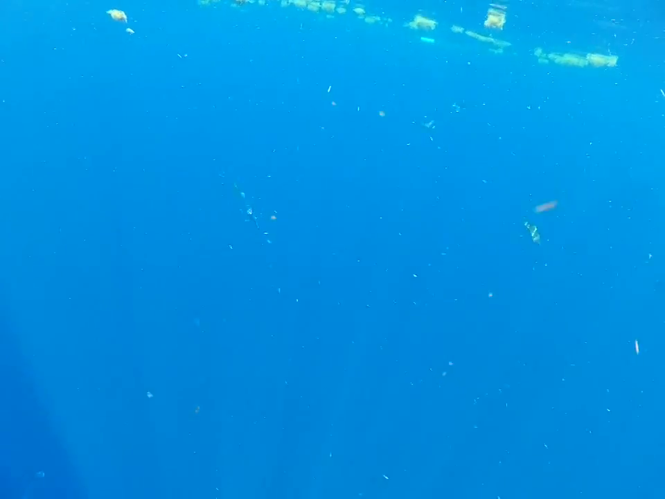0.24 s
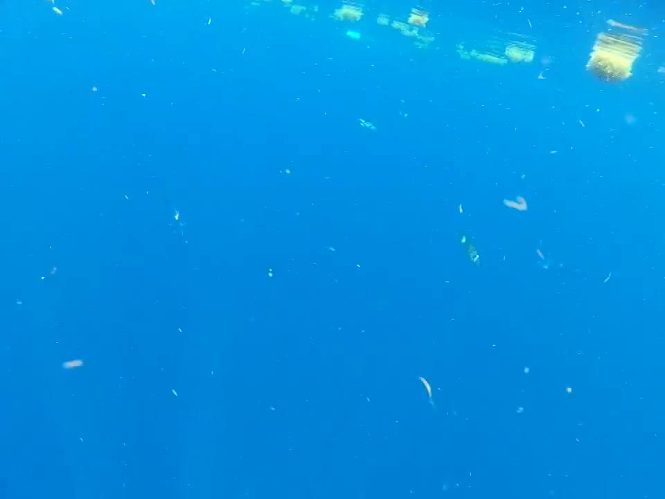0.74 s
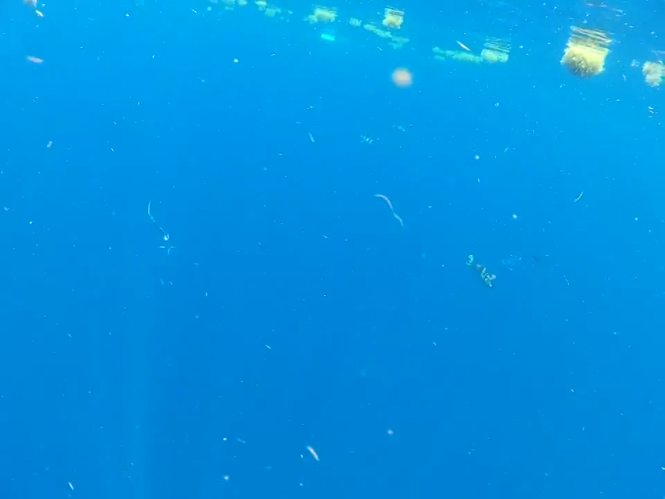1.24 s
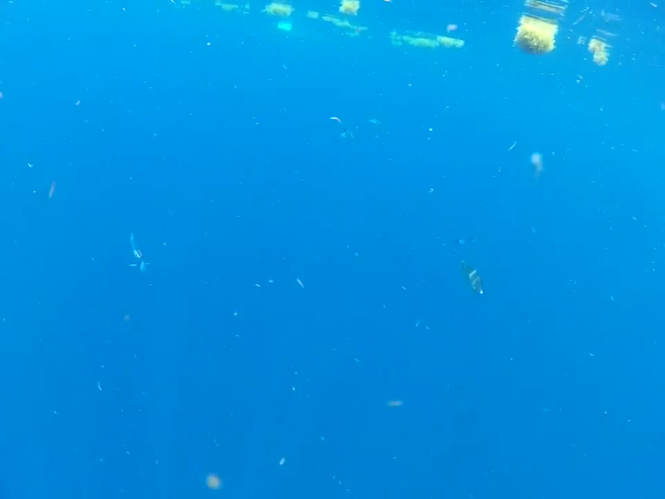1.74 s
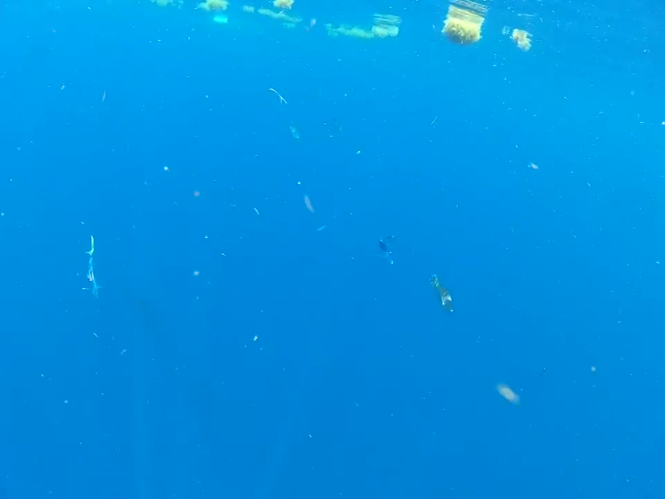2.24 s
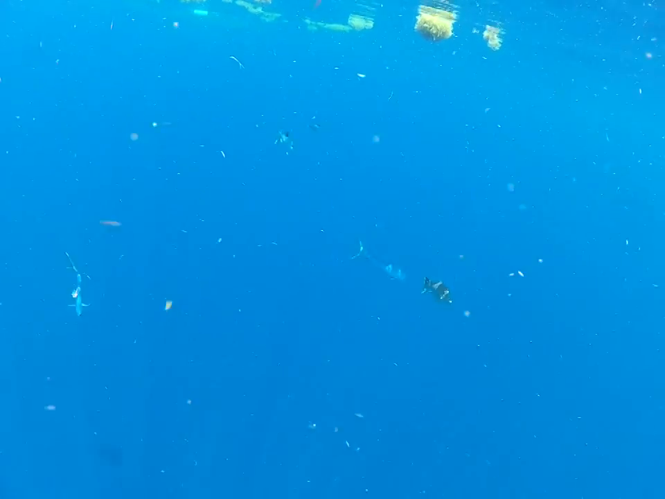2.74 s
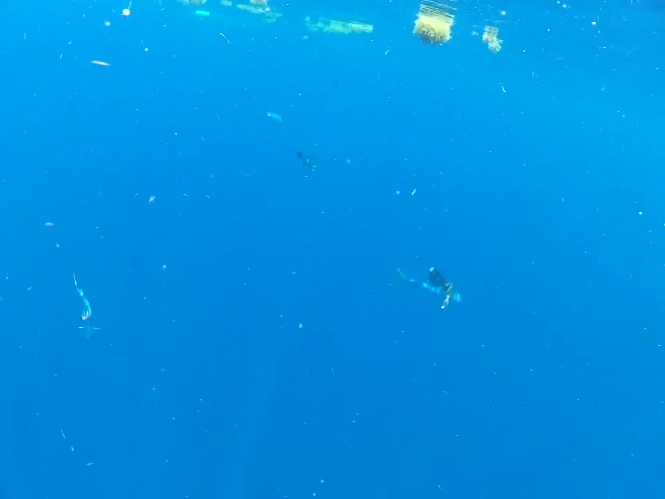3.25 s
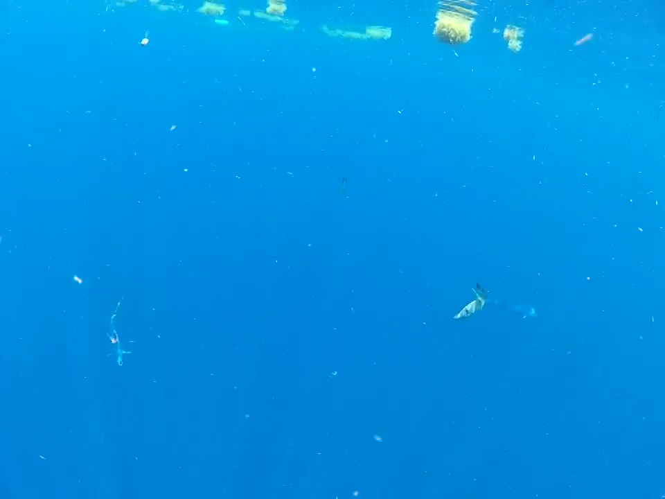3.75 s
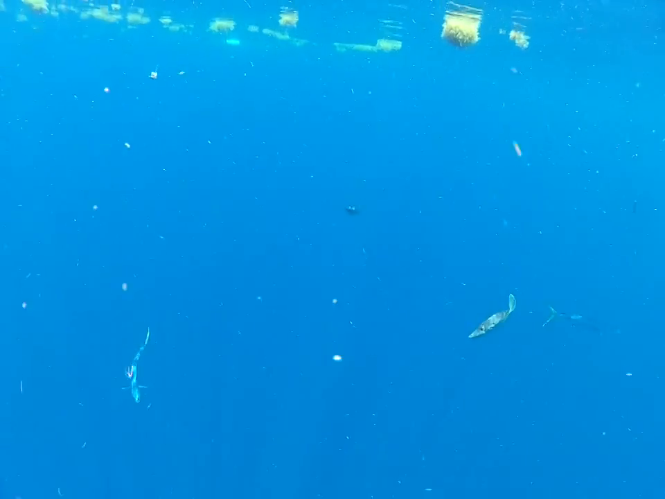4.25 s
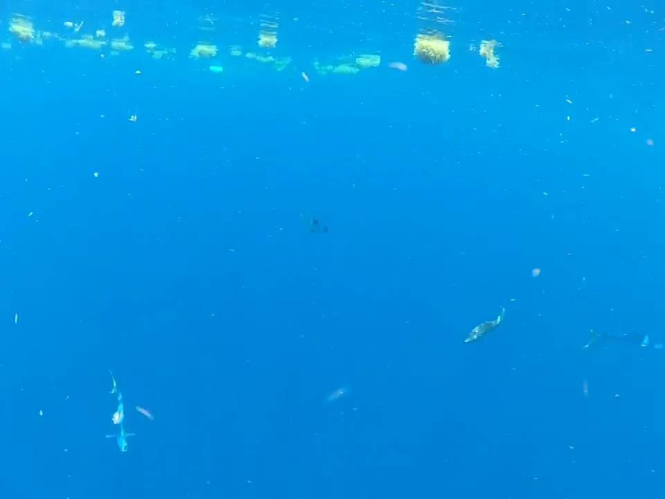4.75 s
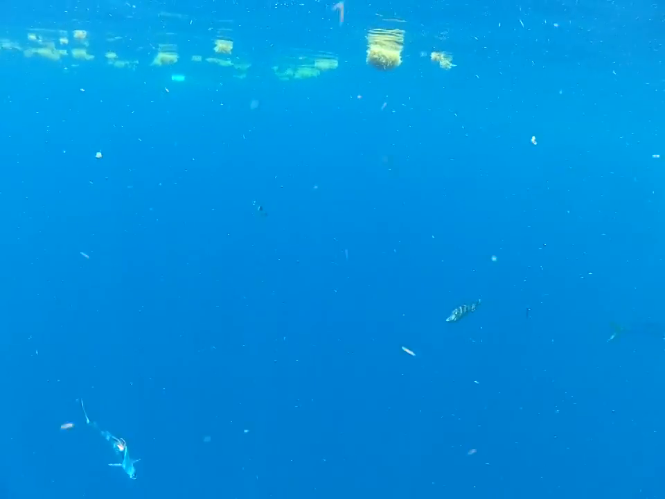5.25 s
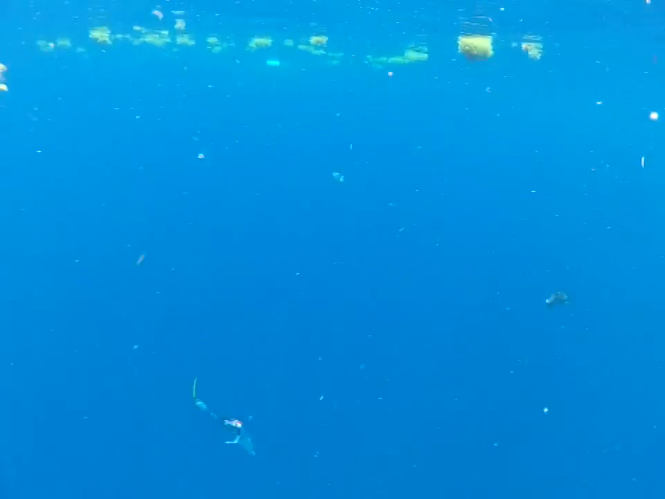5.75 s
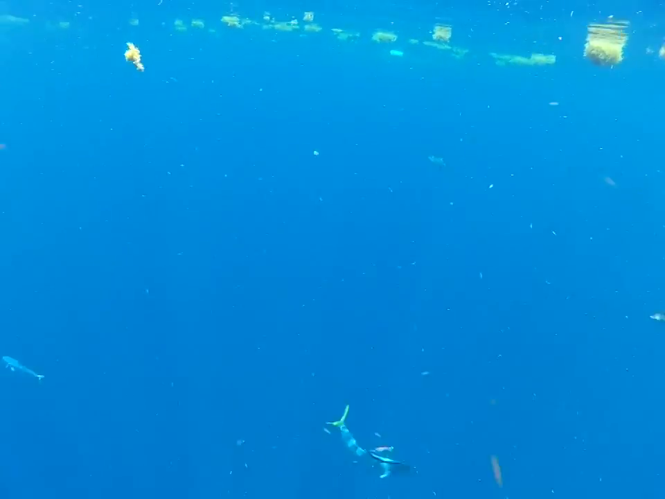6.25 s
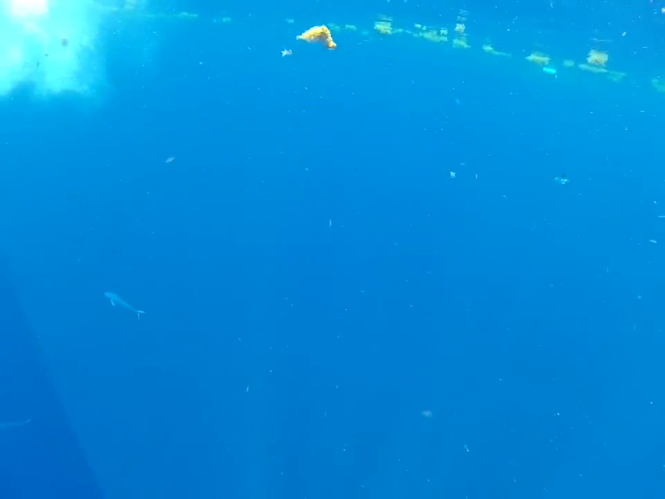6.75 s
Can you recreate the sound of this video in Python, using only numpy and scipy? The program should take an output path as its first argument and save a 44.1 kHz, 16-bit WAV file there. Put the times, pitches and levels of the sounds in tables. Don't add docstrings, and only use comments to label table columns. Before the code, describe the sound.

Inside a sealed underwater housing, a boat engine drones low while the mount bumps and rattles, water churns, and a small bubble rings.

```python
import sys
import numpy as np
from scipy import signal
from scipy.fft import rfft, irfft
from scipy.io import wavfile
from scipy.ndimage import uniform_filter1d

SR = 44100
rng = np.random.default_rng(int(sys.argv[2]) if len(sys.argv) > 2 else 0)


def dump(signal):
    limited = np.clip(np.atleast_2d(signal).T, -1, 1)
    pcm = np.round(limited * 32767).astype(np.int16)
    wavfile.write(sys.argv[1], SR, pcm)


def volts_from_decibels(level):
    exponent = np.asarray(level, float) / 20
    return 10 ** exponent


N = 308259
T = np.arange(N) / SR

# time in seconds, firing rate in Hz, load in dB over idle.
ENGINE_RUN = [(0, 30, -5.5), (.5, 30, 1.5), (1.4, 31.71, -5.5), (2.0, 32.63, -1), (2.35, 35.04, 1),
              (2.6, 37.6, 5.5), (2.8, 38.85, 7), (3.02, 39.17, 11.5), (3.2, 40.85, 12), (3.42, 44.4, 11.5),
              (3.52, 45.3, 4), (3.65, 45.94, 7), (3.85, 45.55, 2), (4.3, 42.9, 1), (4.52, 39.96, 5),
              (4.8, 36.4, 0), (5.9, 35.87, -3), (7, 35.88, 2.5)]
# multiple of the firing rate, level at idle in dB, share of the load followed.
MAIN_ORDERS = [(1, -39, 0.21), (2, -44, 1.43), (3, -48.5, 0.92)]
# multiple of the firing rate, level in dB relative to their common level.
WEAK_ORDERS = [(.5, -7), (1.5, -3.5), (2.5, -5), (3.5, -14.5), (4, -13), (4.5, -17.5), (5, -16),
               (5.5, -19.5), (6, -23.5)]
# time in seconds, change in dB, width in seconds.
LULLS = [
    (.05, -24, 0.23),
    (1.399, -5.5, 0.29),
    (2.17, -3, .1),
    (2.65, -3, .15),
    (3.5, -25, 0.072),
    (4.1, -4, .12),
    (4.6, 4, .25),
    (5.75, -5, 0.16),
]
# frequency in Hz, gain in dB.
HULL_PATH = [(30, -3.5), (42, 1), (75, -4), (82, 3.5), (94, -0.5), (108, 3), (122, -8.5), (134, 3.5)]
# frequency in Hz, width in Hz, level in dB.
HULL_MODES = [(30, 30, -2), (97.6, 38.7, 1), (200, 27, -12.5)]
# frequency in Hz, width in Hz, level for water noise in dB, level for a knock in dB.
HOUSING_MODES = [(225, 47, -8, -11.5), (337.4, 69, -2, -4), (445, 83, -4, 1.5), (554, 49, -0.5, 6),
                 (630, 49, -8, -37), (917, 81, 0, -2.5), (1084, 133, -1.5, -5.5), (1395, 127, -4.5, -6.5),
                 (1688, 84, -13.5, -16), (2053, 199, -5.5, -4), (2215, 174, -6.5, 1.5),
                 (2330, 76, -7.5, -32), (2765, 190, -19, -5), (2890, 115, -10, -26), (3450, 294, -19, -15),
                 (3810, 1100, -26.5, -10), (4270, 660, -26, -21.5), (5200, 1300, -41, -82),
                 (5790, 860, -18.5, -7.5)]
# time in seconds, peak in dB, length in ms.
THUMPS = [(.397, -14, 6.5), (0.4164, -9.5, 18.7), (0.4487, -14.5, 9.3), (0.484, -19.5, 24),
          (0.6277, -16.5, 27), (0.7903, -21.5, 19), (0.829, -32.5, 18), (1.2021, -18.5, 17.5),
          (1.2332, -27, 22), (1.8277, -26.5, 4.3), (1.889, -27.5, 31), (1.9579, -23.5, 6.7),
          (2.226, -28, 39), (2.2767, -29, 19), (2.3053, -30, 7.7), (2.4727, -25, 11), (4.2876, -32, 8.5),
          (4.7787, -28.5, 17), (5.6446, -27, 7.7), (5.814, -26, 6.9), (5.851, -23, 18.6),
          (6.1892, -25.5, 11), (6.361, -32, 15), (6.4044, -18.5, 9.5), (6.415, -27, 6.5),
          (6.4622, -26, 15.7), (6.515, -22, 30), (6.557, -24.5, 14), (6.756, -25.5, 39.5),
          (6.9275, -29.5, 19)]
# time in seconds, peak in dB, frequency in Hz.
MOUNT_RINGS = [(.392, -29, 256), (.411, -36, 243), (0.427, -28.5, 260), (0.481, -27.5, 229),
               (1.199, -36, 235), (1.956, -37.5, 200), (2.771, -34.5, 236), (4.829, -38.5, 238),
               (5.791, -31.5, 173.3), (6.403, -37, 236), (6.509, -37.5, 200)]
# time in seconds, peak in dB.
ARM_SWAYS = [
    (0.517, -30),
    (0.591, -27),
]
# time in seconds, level in dB.
DULL = (0.5, 4500, -1.5, 15), [(.386, -40), (.406, -36), (.421, -38)]
PADDED = (-5.5, 700, 2.5, 47), [(.387, -25), (.406, -23.5), (.424, -31), (.478, -26), (.493, -29.5),
          (.524, -33), (.558, -42), (.595, -27.5), (.648, -36.5), (1.187, -36), (5.779, -39),
          (6.399, -32.5)]
SHARP = (1.5, 6100, 2.5, 23.8), [(.4445, -13.5), (.456, -32), (.465, -29), (.474, -37), (.516, -28)]
RATTLE = (0.7, 2800, 0.3, 20.5), [(.524, -24.5), (.534, -44), (.544, -37), (.558, -45), (.569, -30.5),
          (.578, -24), (.585, -43), (.591, -31), (.598, -34), (.6046, -27), (.614, -29), (.620, -40),
          (.631, -41), (.644, -36), (.658, -42), (.670, -39.5), (.700, -51)]
SCRAPE = (2.5, 1200, 1.5, 24), [(4.830, -29), (4.837, -27), (4.844, -30), (4.857, -29), (4.863, -29),
          (4.871, -31)]
TICK = (-1.5, 3200, .5, 12), [(3.636, -44), (4.825, -36), (6.3978, -30)]
# time in seconds, peak in dB, frequency in Hz, t60 in ms.
BUBBLES = [
    (4.002, -30, 1095, 32),
    (3.985, -41, 1140, 15),
]
# time in seconds, level in dB over calm.
CHURN = [(0, -0.5), (.39, 1), (.53, 7), (.65, 1), (.82, 0.5), (1.8, 1.5), (2.63, 4.5), (3.43, 7), (4.13, 7),
         (4.4, 4.5), (5.5, 4), (7, 5)]
# frequency in Hz, threshold in dB relative to the mean treble level.
MASKING = [(3000, -9), (4500, -7), (6000, -12), (7000, -4), (8500, -4), (12000, -7), (13700, -2),
           (14600, -3), (15000, 0)]

CHATTER_S, CHATTER_HOLD_S, EDGE_S = 2.16, 0.47, 0.057
LABOUR_HOLD_S, LABOUR_DB, LABOUR_FROM = 0.78, 12, 3.4
HOLD_HZ, TOP_HZ = 12000, 15050


def in_time(rows):
    s, *columns = np.transpose(rows)
    return [np.interp(T, s, column) for column in columns]


def rms_one(x):
    return x / np.sqrt(np.mean(x ** 2) + 1e-20)


def drift(rate):
    r = np.exp(-80 * np.pi * rate / SR)
    noise = rng.standard_normal(N // 40 + 2002)
    slow = signal.lfilter([1], [1, -2 * r, r * r], noise)[2000:]
    return np.interp(np.arange(N) / 40, np.arange(len(slow)), rms_one(slow))


def hold(start, length):
    return np.clip(np.minimum(T - start, start + length - T) / EDGE_S + 1, 0, 1)


def resonate(x, hz, width):
    r = np.exp(-np.pi * 1.55 * width / SR)
    b = (1 - r * r) / 2 * np.array([1, 0, -1])
    a = [1, -2 * r * np.cos(2 * np.pi * hz / SR), r * r]
    once = signal.lfilter(b, a, x + 1e-18)
    return signal.lfilter(b, a, once)


def noise_in(modes, flicker_db, shared_db):
    out = 0
    for hz, width, level_db in modes:
        gain = volts_from_decibels(level_db + flicker_db * drift(7.3) + shared_db)
        out = out + gain * resonate(rng.standard_normal(N), hz, width)
    return rms_one(out)


def engine():
    rate, load_db = in_time(ENGINE_RUN)
    turn = 2 * np.pi * np.cumsum(rate) / SR
    path_hz, path_db = np.transpose(HULL_PATH)
    lull_db = sum(db * np.exp(-((T - s) / width) ** 2) for s, db, width in LULLS)
    labour_db = LABOUR_DB * hold(CHATTER_S, LABOUR_HOLD_S)
    orders = []
    for k, idle_db, share in MAIN_ORDERS:
        level_db = idle_db + share * load_db + np.interp(np.log(k * rate), np.log(path_hz), path_db)
        orders.append((k, level_db + (k == 1) * lull_db))
    for k, relative_db in WEAK_ORDERS:
        level_db = -47.5 + 0.29 * load_db + relative_db
        orders.append((k, level_db + (k > LABOUR_FROM) * labour_db))
    pump_phase = 2 * np.pi * 53.6 * T + 0.4 * drift(1.7)
    out = volts_from_decibels(-59 + 1.1 * drift(3.8)) * np.sin(pump_phase)
    for k, level_db in orders:
        phase = k * turn + k * 0.32 * drift(2.45) + rng.uniform(0, 2 * np.pi)
        out += volts_from_decibels(level_db + 1.95 * drift(3.3)) * np.sin(phase)
    return np.sqrt(2) * out, turn, load_db


def chatter():
    return volts_from_decibels(-44.5) * hold(CHATTER_S, CHATTER_HOLD_S) * noise_in([(189.8, 27.4, 0)], 0.54, 0)


def thumps():
    pushes = [(s, db, 101.9 + 25 * volts_from_decibels(db), ms) for s, db, ms in THUMPS]
    pushes += [(s, db, hz, 12.4) for s, db, hz in MOUNT_RINGS]
    pushes += [(s, db, 50.7, 17) for s, db in ARM_SWAYS]
    out = np.zeros(N)
    for s, peak_db, hz, ms in pushes:
        near = slice(int((s - .08) * SR), int((s + .08) * SR))
        t = T[near] - s
        swell = np.exp(-(2000 * t / ms) ** 2 / 2)
        out[near] += volts_from_decibels(peak_db) * swell * np.cos(2 * np.pi * hz * t)
    return out


def knocks():
    out, span = np.zeros(N), int(.12 * SR)
    t = T[:span] * 1000
    contacts = [row + kind for kind, rows in (DULL, PADDED, SHARP, RATTLE, SCRAPE, TICK) for row in rows]
    for s, level_db, tilt_db, cut_hz, rise, t60 in contacts:
        attack = np.minimum(t / max(rise, .1), 1) ** 2
        shape = attack * volts_from_decibels(-60 * np.maximum(t - rise, 0) / t60)
        burst = shape * rng.standard_normal((2, span))
        start = int(s * SR)
        for k, (hz, width, _, knock_db) in enumerate(HOUSING_MODES):
            share = np.sqrt(np.mean(shape ** 2) * width / SR)
            gain = share * volts_from_decibels(level_db + knock_db + tilt_db * np.log2(hz / 1000) + 16)
            gain /= 1 + (hz / cut_hz) ** 4
            out[start:start + span] += gain * rms_one(resonate(burst[k % 2], hz, 1.55 * width))
    return out


def bubbles():
    out = np.zeros(N)
    for s, peak_db, hz, t60 in BUBBLES:
        t = np.maximum(T - s, 0)
        shape = volts_from_decibels(peak_db - 6e4 * t / t60) * (1 - np.exp(-t / .002))
        out += shape * np.sin(2 * np.pi * hz * t * (1 + 4.4 * t))
    return out


def water(turn, load_db):
    churn_db, = in_time(CHURN)
    shake_db = 12 * np.exp(-((T - 0.51) / 0.21) ** 2)
    hull_db = -45.5 + 0.82 * load_db + shake_db
    surge_db = 0.32 * drift(4.7) + 0.5 * np.sin(turn)
    low = [mode[:3] for mode in HOUSING_MODES if mode[0] < 770]
    high = [mode[:3] for mode in HOUSING_MODES if mode[0] > 770]
    rumble = volts_from_decibels(hull_db) * noise_in(HULL_MODES, 0.9, 0)
    wash = volts_from_decibels(-52 + churn_db) * noise_in(low, 2.8, surge_db)
    hiss = volts_from_decibels(-58 + 0.97 * churn_db) * noise_in(high, 0.93, surge_db)
    return rumble + wash + hiss


def scene():
    hum, turn, load_db = engine()
    return (hum + chatter() + thumps() + knocks() + bubbles() + water(turn, load_db))[None]


def sample_and_hold(x):
    kept = signal.sosfilt(signal.cheby2(8, 32, 6010, fs=SR, output="sos"), x)
    hz = np.fft.rfftfreq(N, 1 / SR)
    droop = np.sinc(hz / HOLD_HZ)
    kept = irfft(rfft(kept) / np.maximum(droop, .5), N)
    sampled = kept * (1 + 2 * np.cos(2 * np.pi * HOLD_HZ * T))
    return irfft(rfft(sampled) * droop / (1 + (hz / TOP_HZ) ** 300), N)


def thin_out(x):
    hz, _, frames = signal.stft(x, SR, nperseg=1880)
    power = uniform_filter1d(np.abs(frames) ** 2, size=3, axis=1)
    level_db = 10 * np.log10(power + 1e-20)
    peak_db = level_db.max(axis=0)
    loud_db = peak_db - np.median(peak_db)
    treble_db = level_db[(hz > 6500) & (hz < 14500)].mean(axis=0)
    mask_hz, under_db = np.transpose(MASKING)
    for low in range(128, 648, 5):
        band = slice(low, low + 5)
        wander = uniform_filter1d(rng.standard_normal(len(loud_db)), size=4)
        top_heavy = .35 if hz[low] > 14400 else .03
        mask_db = treble_db + np.interp(hz[low], mask_hz, under_db) + top_heavy * loud_db + 2.5 * wander
        frames[band] *= np.where(level_db[band].mean(axis=0) < mask_db, .03, 1)
    return signal.istft(frames, SR, nperseg=1880)[1][:N]


def top_cut(x):
    return signal.sosfilt(signal.butter(12, 16320, fs=SR, output="sos"), x)


def record(dry):
    held = sample_and_hold(dry[0])
    mix = thin_out(held)[None]
    return top_cut(mix)


dry = scene()
out = record(dry)
dump(out)
```